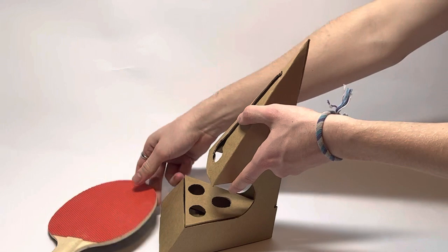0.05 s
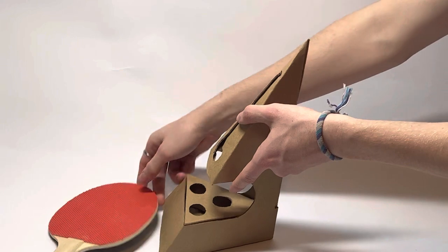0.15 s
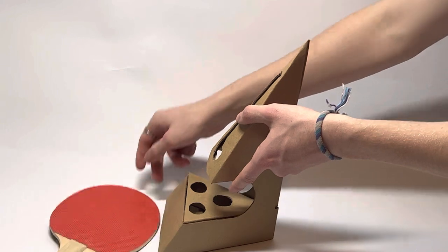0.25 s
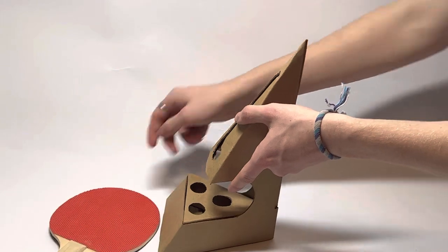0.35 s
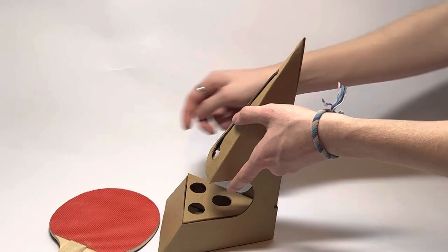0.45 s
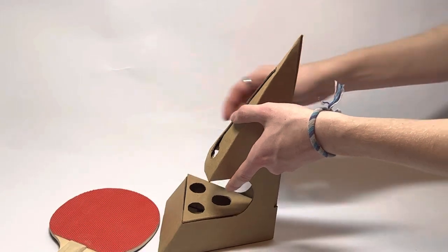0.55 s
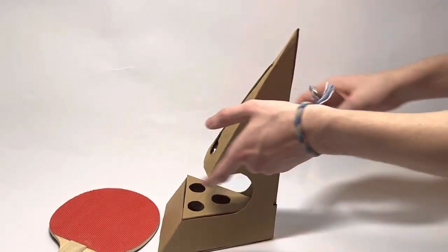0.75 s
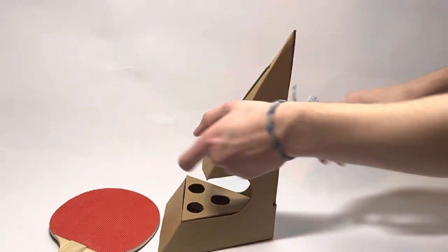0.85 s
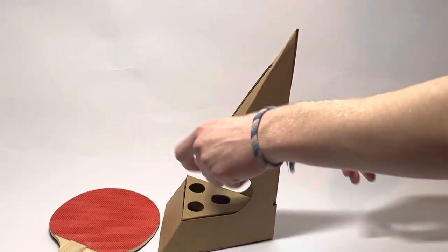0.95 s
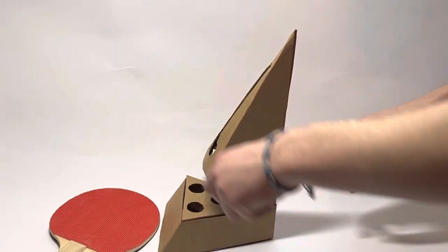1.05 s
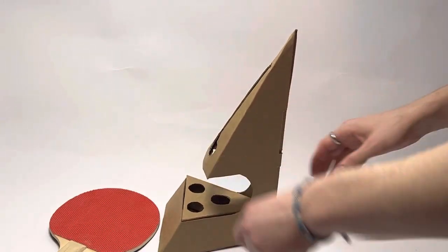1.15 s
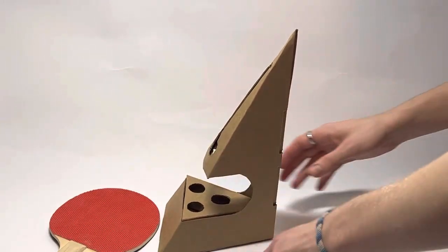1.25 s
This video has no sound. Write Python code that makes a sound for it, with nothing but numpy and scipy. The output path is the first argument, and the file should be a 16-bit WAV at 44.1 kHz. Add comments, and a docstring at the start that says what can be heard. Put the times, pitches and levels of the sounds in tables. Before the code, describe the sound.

Close up in a quiet room, a rubber-faced wooden paddle taps a table, lands with a sharp knock and rattles to a stop. Faint, grainy rubbing follows as a hand slides off a cardboard model.

```python
"""A quiet room, close to a table on which a rubber-faced wooden paddle is laid.
Its edge clicks down, the blade slaps flat and rocks to rest. Hard contacts ring the blade;
padded blows ring paddle and table together, and the table sways.
Then a hand lets go of a cardboard model and brushes along it: grainy friction, two faint squeaks.
Short reverberation and a low room tone lie behind."""
import sys
import numpy as np
from scipy import signal
from scipy.fft import rfft, irfft
from scipy.io import wavfile
from scipy.ndimage import uniform_filter1d

SR = 44100
rng = np.random.default_rng(int(sys.argv[2]) if len(sys.argv) > 2 else 0)


def transcribe(u):
    """Save the signal u as a 16-bit wav file named by the first command-line argument.

    u: samples, shape (n,) or (channels, n), limited to [-1, 1]; the rate is SR.
    q: integer samples, one column per channel.
    """
    v = np.clip(np.atleast_2d(u).T, -1, 1)
    q = np.round(v * 32767).astype(np.int16)
    wavfile.write(sys.argv[1], SR, q)


N = 57330
BAND_LIMIT_HZ = 15900

# Hard contacts. Each row: start in seconds, level in dB, low and high edge in Hz, decay in seconds.
CONTACTS = [(.0265, -33.5, 1170, 8600, 0.0023), (.069, -10.5, 390, 917, 0.00089),
            (.2085, -18.5, 300, 2210, 0.006), (.2163, -1, 483, 15000, 0.00089),
            (0.2332, -48, 400, 3920, 0.00041), (.2877, -7, 1490, 6650, 0.00055),
            (.300, -18.5, 400, 1720, 0.00067), (.352, -18, 495, 2280, 0.0018),
            (.434, -35.5, 500, 2500, 0.0021), (.653, -26, 248, 860, 0.0034)]
# Contact spectrum. Each row: frequency in Hz, gain in dB.
CONTACT_SPECTRUM = [(150, -20), (600, 4.5), (1000, 1.5), (1500, 1), (2200, -0.5), (3500, -12), (4800, -17),
                    (5700, -9), (6800, -17.5), (7900, -3.5), (9200, -14), (11800, -7.5), (16000, -21)]
# Wooden blade modes. Each row: frequency in Hz, level in dB, T60 in seconds.
BLADE_MODES = [(589, -5, 0.075), (662, -5, 0.069), (921.6, -5, 0.16), (1170, -2, 0.036), (2110, -3, 0.01),
               (2370, 4, 0.0096), (2483, 8, 0.017), (3306, -5.5, 0.056)]
def clicks():
    """Each contact is a brief crunch that spreads through the wood, treble first, and rings the blade."""
    out, t = np.zeros(N), np.arange(SR // 2) / SR
    hz = np.fft.rfftfreq(len(t), 1 / SR)
    trim_db, ring_db, dispersion_s = -3, -41, 0.002204
    # Bending waves: delay falls as 1/sqrt(f), offset to zero at the band limit.
    bend_cycles = dispersion_s * (2 * np.sqrt(1000 * hz) - hz * np.sqrt(1000 / BAND_LIMIT_HZ))
    bend = np.exp(-2j * np.pi * bend_cycles)
    for start_s, db, low_hz, high_hz, decay_s in CONTACTS:
        fade = np.exp(-t / decay_s)
        gate = np.exp(-(t / decay_s / 4) ** 4)
        crunch = rng.choice([-1., 1.], len(t)) * fade
        for _ in range(4):  # flatten the spectrum, keep the burst short
            flat = np.exp(1j * np.angle(rfft(crunch)))
            crunch = irfft(flat, len(t)) * gate
        crunch /= np.linalg.norm(crunch)
        spread = irfft(rfft(crunch) * bend, len(t)) * (t < t[-1] / 2)
        blade = amp(ring_db) * (1 - fade) * ring(BLADE_MODES, t)
        hit = coloured(spread, CONTACT_SPECTRUM) + blade
        band = signal.butter(2, [low_hz, high_hz], "bandpass", fs=SR, output="sos")
        add(out, start_s, amp(trim_db + db) * signal.sosfilt(band, hit))
    return out


# Padded blows. Each row: start in seconds, level in dB, low-pass cutoff in Hz.
BLOWS = [(.032, -17, 192), (0.0443, -22.5, 244), (0.0513, -19.5, 190), (0.0623, -21.5, 172),
         (0.075, -18, 245), (0.2197, -2.5, 780), (0.2247, 1, 710), (0.2458, -14.5, 870), (0.2619, -10, 920),
         (0.276, -19, 600), (.29, -12, 920), (0.3023, -11.5, 720), (.335, -19, 507), (0.348, -13, 357),
         (0.36, -16.5, 262), (0.414, -25, 201), (.659, -32.5, 402), (.679, -27, 200)]
# Joint modes of paddle and table. Each row: frequency in Hz, level in dB, T60 in seconds.
TABLE_MODES = [(137.3, -12, 0.04), (173, -0.5, .022), (212.3, -18.5, .17), (267, -11, 0.05),
               (338.4, -14, .13), (372, -9.5, 0.031), (417.5, 2, 0.017), (547, -20, 0.033),
               (660, -16.5, 0.013)]
def thuds():
    """Padded blows ring paddle and table together; softer ones favour the lowest modes."""
    out, t = np.zeros(N), np.arange(SR // 2) / SR
    trim_db, rise_s, highpass_hz = -19.5, 0.00095, 85
    knock = (1 - np.exp(-t / rise_s)) * ring(TABLE_MODES, t)
    for start_s, db, cutoff_hz in BLOWS:
        padded = signal.lfilter(*signal.butter(1, cutoff_hz, fs=SR), knock)
        add(out, start_s, amp(trim_db + db) * padded)
    return signal.lfilter(*signal.butter(2, highpass_hz, "highpass", fs=SR), out)


# Pushes on the table. Each row: start in seconds, level in dB.
PUSHES = [(0.12, -9.5), (0.229, -13), (0.307, 1), (.39, -8), (0.678, -12.5)]
# Slow table modes. Each row: frequency in Hz, level in dB, T60 in seconds.
SLOW_MODES = [(42.5, -52.5, .4), (57.4, -44.5, 0.33), (96.6, -48.5, 0.22)]
def table_sway():
    """The table sways in its slow modes as the paddle touches and settles."""
    out, t = np.zeros(N), np.arange(SR // 2) / SR
    rise_s = 0.0032
    sway = (1 - np.exp(-t / rise_s)) * ring(SLOW_MODES, t)
    for start_s, db in PUSHES:
        add(out, start_s, amp(db) * sway)
    return out


# Rubbing strokes. Each row: peak time, rise and fall in seconds, level in dB, roll-off in dB/octave.
RUBS = [(0.03, 0.0055, 0.018, -64.5, 3.5), (0.161, 0.02, 0.028, -55, 6), (0.228, 0.013, 0.012, -49, 2),
        (0.358, 0.086, 0.044, -62.5, 7.5), (0.666, 0.0079, 0.012, -70.5, 7), (.78, 0.066, 0.051, -72, -3),
        (0.833, 0.034, 0.048, -62.5, -1.5), (0.896, 0.041, 0.028, -66.5, -3.5),
        (1.085, 0.12, 0.055, -81, 4), (1.282, 0.057, 0.086, -71, 1.5)]
# Friction spectrum. Each row: frequency in Hz, gain in dB.
RUB_SPECTRUM = [(100, -23.5), (400, -4), (1000, -3.5), (1900, 0), (3500, -4), (4500, -1.5), (6700, -5),
                (9000, -6), (11800, 0), (15000, -7.5), (16000, -12.5)]
def rubbing():
    """Skin and rubber slide over card and table: grainy friction that swells and fades."""
    out, t = np.zeros(N), np.arange(N) / SR
    grain_db, grain_s = 2, 0.003
    for peak_s, rise_s, fall_s, db, rolloff in RUBS:
        grain = unit_rms(uniform_filter1d(rng.standard_normal(N), int(grain_s * SR)))
        friction = rng.standard_normal(N) * amp(grain_db * grain)
        spectrum = [(hz, level - rolloff * np.log2(hz)) for hz, level in RUB_SPECTRUM]
        from_peak = (t - peak_s) / np.where(t < peak_s, rise_s, fall_s)
        swell = np.exp(1 - np.hypot(1, 1.453 * from_peak))  # rounded top, exponential flanks
        out += amp(db) * unit_rms(coloured(friction, spectrum)) * swell
    return out


# Skin on card. Each row: peak time and half length in seconds, pitch in Hz, level in dB.
FINGER_CATCHES = [(1.15, 0.036, 4760, -89), (1.21, 0.04, 5070, -88)]
def squeaks():
    """A finger catches on the card with a thin, fuzzy whistle."""
    out, t = np.zeros(N), np.arange(N) / SR
    hz = np.fft.rfftfreq(N, 1 / SR)
    width_hz = 230
    for peak_s, half_s, pitch_hz, db in FINGER_CATCHES:
        band = np.exp(-(2 * (hz - pitch_hz) / width_hz) ** 2)
        whistle = unit_rms(irfft(rfft(rng.standard_normal(N)) * band, N))
        out += amp(db) * whistle * np.exp(-((t - peak_s) / half_s) ** 2)
    return out


# Table-top reflection, left then right. Each row: delay in seconds, gain in dB.
BOUNCE_PATHS = [(.00032, -12.5), (.00039, -16.5)]
def table_bounce(x):
    """Direct sound plus one reflection off the table top, on its own path to each microphone port."""
    hz = np.fft.rfftfreq(N, 1 / SR)
    combs = [1 + amp(db) * np.exp(-2j * np.pi * hz * delay_s) for delay_s, db in BOUNCE_PATHS]
    return irfft(rfft(x) * np.array(combs), N)


# Room decay. Each row: frequency in Hz, T60 in seconds.
REVERB_T60 = [(80, .5), (250, 0.48), (600, 0.1521), (2000, 0.27), (6000, 0.2554), (14000, 0.55)]
# Reverberation spectrum. Each row: frequency in Hz, gain in dB.
REVERB_SPECTRUM = [(60, -7), (180, -1), (350, -3), (700, 6), (2000, -1.5), (6000, -3), (14000, -16.5)]
def reverb(x):
    """Dense reflections, strongest early, each band dying at its own speed."""
    trim_db, onset_s, early_db, early_s = -3, 0.0034, 3.5, 0.0067
    hz, t, bands = signal.stft(rng.standard_normal((2, SR)), SR, nperseg=256)
    decay = np.exp(-np.log(1000) * t / curve_at(REVERB_T60, hz)[:, None])
    early_boost = amp(early_db * np.exp(-t / early_s))
    tail = signal.istft(bands * decay * early_boost, SR)[1]
    fade_in = np.clip(np.arange(tail.shape[1]) / SR / onset_s - .5, 0, 1)
    tail = diffuse(tail * fade_in)
    tail = coloured(tail / np.linalg.norm(tail[0]), REVERB_SPECTRUM)
    return amp(trim_db) * signal.fftconvolve(x[None], tail, axes=1)[:, :N]


# Room tone spectrum. Each row: frequency in Hz, relative density in dB.
TONE_SPECTRUM = [(20, -9), (45, -2.5), (95, 1.5), (160, -11.5), (300, -10), (500, -24.5), (1000, -29.5),
                 (2000, -39), (4000, -49), (8000, -47.5), (12000, -44.5), (14500, -40), (16000, -66.5)]
def room_tone(rms_db=-60.5):
    """Steady low noise with a faint hiss."""
    noise = coloured(rng.standard_normal((2, N + SR)), TONE_SPECTRUM)[:, -N:]
    return amp(rms_db) * unit_rms(diffuse(noise))


# Left-right likeness of diffuse sound. Each row: frequency in Hz, coherence from 0 to 1.
COHERENCE = [(30, 0.91), (250, 0.95), (700, 0.57), (1100, 0), (2000, 0.99), (4000, 0.99), (7000, 1),
             (8500, 1), (16000, 1)]
def diffuse(pair):
    """Makes two unrelated signals partly alike, as two close ports hear them."""
    size = pair.shape[1]
    a, b = rfft(pair)
    coherence = curve_at(COHERENCE, np.fft.rfftfreq(size, 1 / SR))
    mid, side = a * np.sqrt((1 + coherence) / 2), b * np.sqrt((1 - coherence) / 2)
    return irfft(np.array([mid + side, mid - side]), size)


def amp(db):
    """Decibels to gain."""
    return 10 ** (np.asarray(db) / 20)


def unit_rms(x):
    """Scales to an rms of one."""
    return x / np.sqrt(np.mean(x ** 2) + 1e-20)


def curve_at(points, hz):
    """Interpolates a table on a log frequency axis."""
    knots_hz, values = np.transpose(points)
    return np.interp(np.log(hz + 1), np.log(knots_hz + 1), values)


def add(mix, start_s, sound):
    """Mixes a sound in at start_s."""
    part = mix[round(start_s * SR):][:len(sound)]
    part += sound[:len(part)]


def coloured(x, spectrum, size=8192):
    """Minimum-phase filter with the given dB curve."""
    log_gain = np.log(amp(curve_at(spectrum, abs(np.fft.fftfreq(size, 1 / SR)))))
    response = np.exp(np.conj(signal.hilbert(log_gain)))
    taps = np.fft.ifft(response).real[:size // 2]
    return np.apply_along_axis(lambda v: signal.fftconvolve(v, taps)[:len(v)], -1, x)


def ring(modes, t):
    """Sum of damped sines."""
    return sum(amp(db) * np.exp(-np.log(1000) * t / t60) * np.sin(2 * np.pi * hz * t)
               for hz, db, t60 in modes)


def scene():
    """Contacts and rubbing, their reverberation, and the room tone."""
    hard = clicks()
    soft = thuds() + table_sway() + rubbing() + squeaks()
    return table_bounce(hard) + soft + reverb(hard + soft) + room_tone()


# Stereo balance. Each row: frequency in Hz, left minus right in dB.
STEREO_BALANCE = [(30, 0), (80, -1.5), (170, -2.5), (350, -1.5), (700, 0), (1400, 1.8), (2500, 0),
                  (16000, 0.5)]
# Stereo widening. Each row: frequency in Hz, lag of the right channel in radians.
WIDENING_PHASE = [(0, 0), (7300, 0), (8000, 0.2), (8600, 2.08), (9200, 3), (9800, 3.5), (11000, 5),
                  (12000, 6.28), (13000, 8), (14100, 11), (14700, 7.5), (15500, 15.5)]
def record(dry):
    """Slight imbalance, stereo widening (left and right part in phase above 7 kHz), band limit."""
    hz = np.fft.rfftfreq(2 * N, 1 / SR)
    left = amp(curve_at(STEREO_BALANCE, hz) / 2)
    right = np.exp(-1j * curve_at(WIDENING_PHASE, hz)) / left
    widened = irfft(rfft(dry, 2 * N) * np.array([left, right]))[:, :N]
    lowpass = signal.firwin(511, BAND_LIMIT_HZ, window=("kaiser", 9), fs=SR)
    return signal.oaconvolve(widened, lowpass[None], "same")


dry = scene()
out = record(dry)
transcribe(out)
```